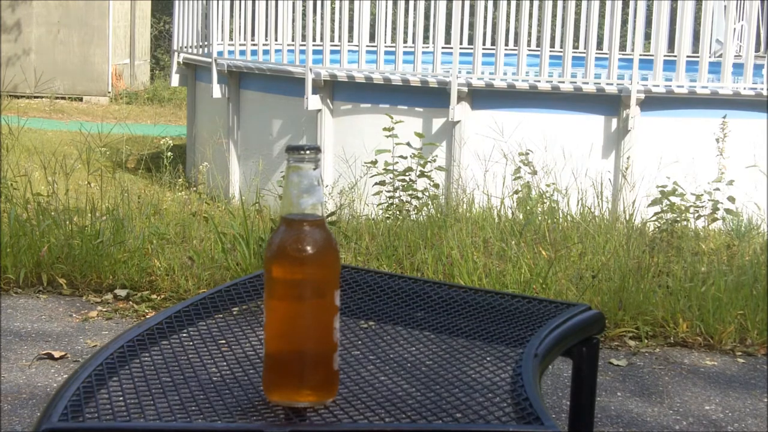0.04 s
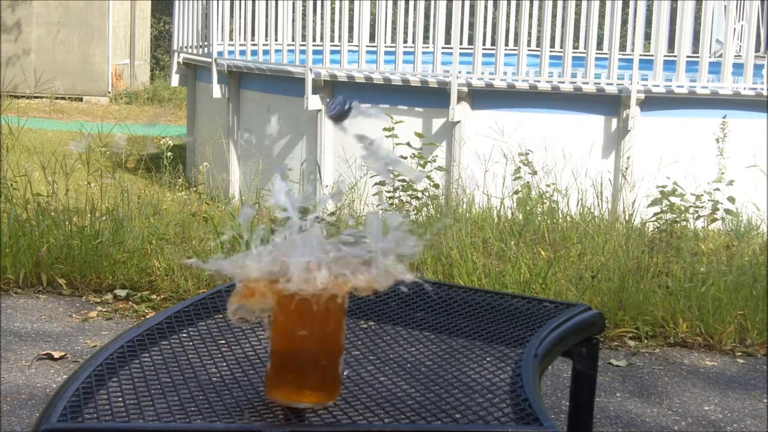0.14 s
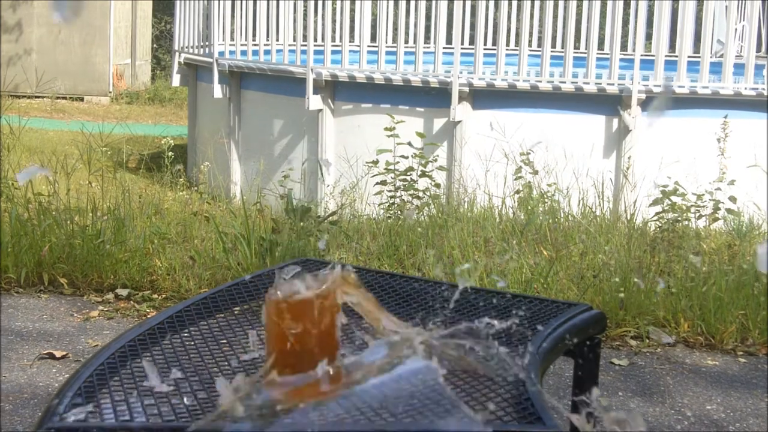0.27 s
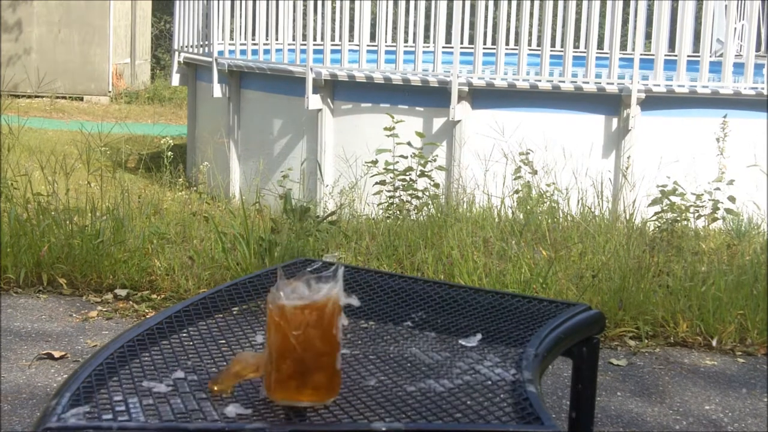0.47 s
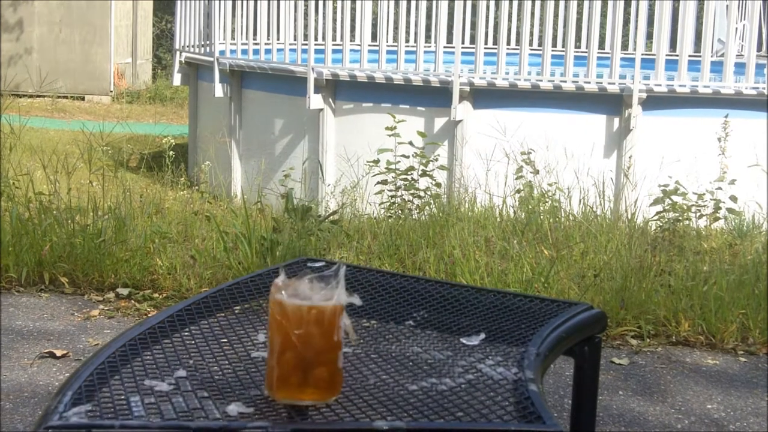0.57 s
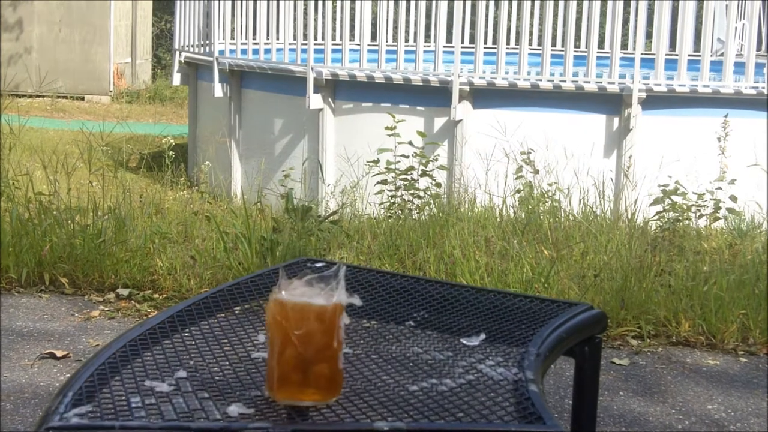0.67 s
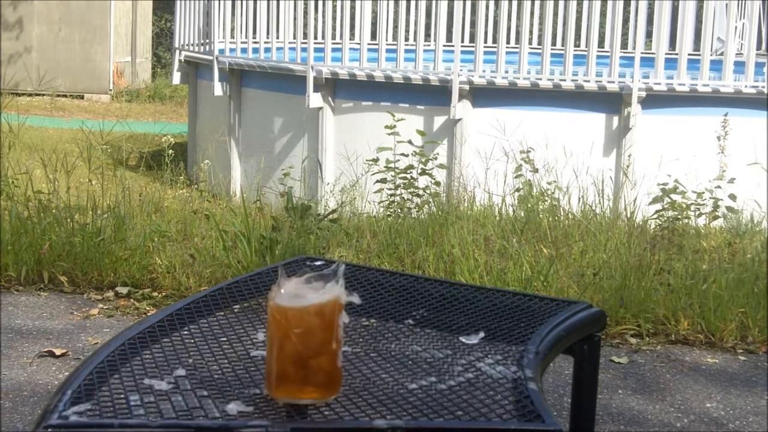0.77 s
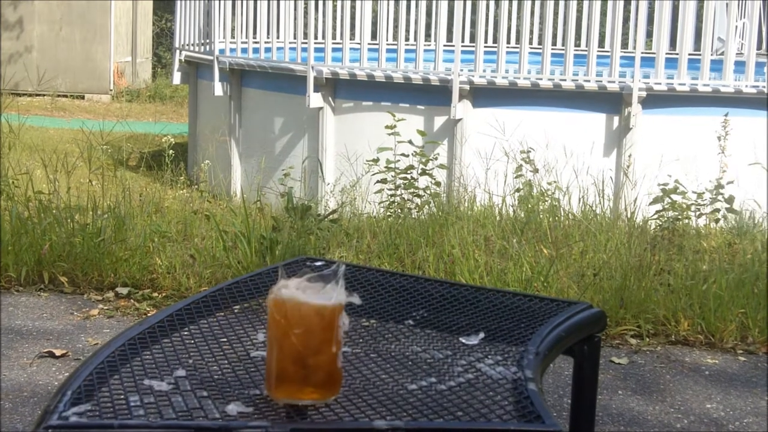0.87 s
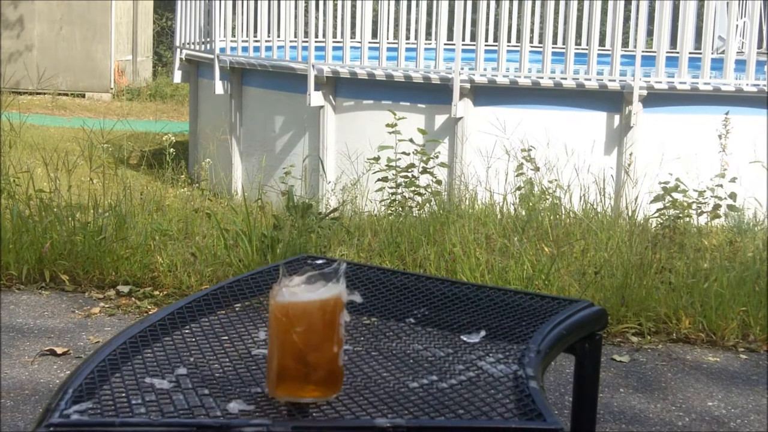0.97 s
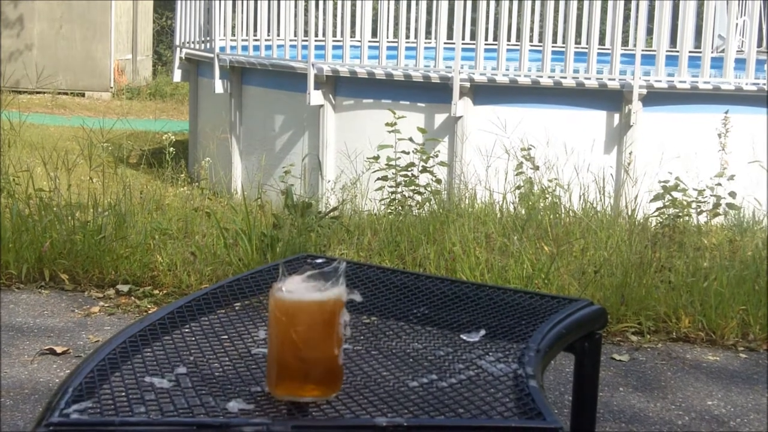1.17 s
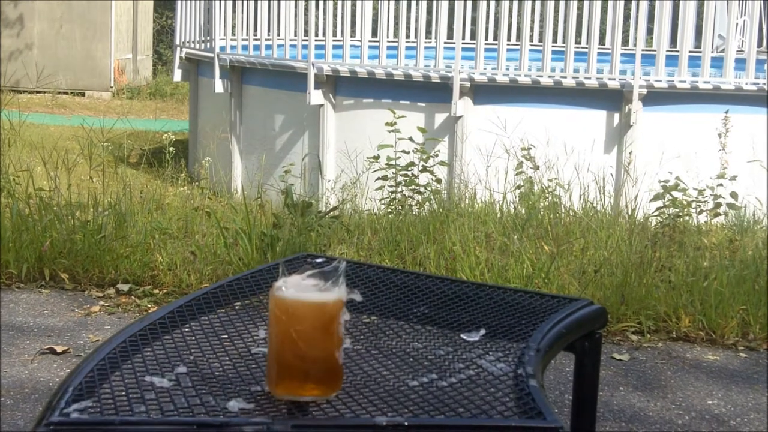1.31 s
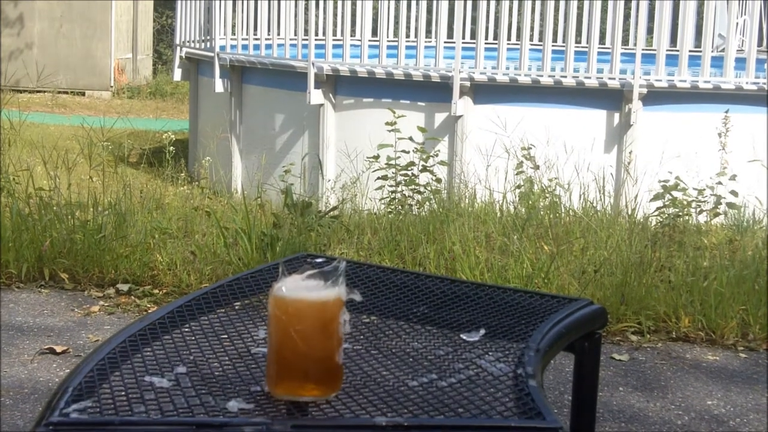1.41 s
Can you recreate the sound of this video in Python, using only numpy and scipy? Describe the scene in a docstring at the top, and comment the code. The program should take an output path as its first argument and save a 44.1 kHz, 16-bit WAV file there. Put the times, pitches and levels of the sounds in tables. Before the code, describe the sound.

A glass bottle cracks sharply at about 0.2 seconds and shatters with a loud, distorted bang at 0.25. Liquid and splinters spray down in a hiss from 0.3 to 0.6 seconds. Bright shards click from 0.55, and a heavier piece clanks on a metal table with a splash at 0.7. Softer knocks and high tinkles thin out until about 1.4 seconds, over a faint, low outdoor rumble.

```python
"""In a quiet garden, a shot hits a glass beer bottle on a steel mesh table. Brittle fracture gives
sharp cracks and splintering, then the pressure pulses of a bang overload the sound. Beer and splinters
spray down as a dense train of tiny impacts. Heavy pieces excite the modes of the metal, while small
shards tick and ring in damped free vibration as they settle. An automatic gain control ducks at the
bang and creeps back over the garden's low rumble."""
import sys
import numpy as np
from scipy import signal
from scipy.fft import rfft, irfft
from scipy.io import wavfile

SR = 44100
rng = np.random.default_rng(int(sys.argv[2]) if len(sys.argv) > 2 else 0)


def to_wav(sig):
    """Store sig (one row per channel, or 1-D mono) as 16-bit WAV at the path in sys.argv[1].

    Samples outside -1..1 are clipped; the rate is SR.
    """
    pcm = np.clip(np.atleast_2d(sig), -1, 1) * 32767
    pcm = np.round(pcm).astype(np.int16)
    wavfile.write(sys.argv[1], SR, pcm.T)  # frames by channels


N = 63945

# Spectrum of the garden's background. Each row: frequency in Hz, relative level in dB.
GARDEN_SPECTRUM = [(20, 7), (45, -5.5), (90, -2.5), (170, -15.5), (260, -12), (430, -23), (1100, -25.5),
                   (2500, -40), (4500, -45), (7400, -26), (10000, -49.5), (15000, -57.5)]

# Cracks of the bottle wall. Each row: start in seconds, peak level in dB.
CRACKS = [(.2033, 4.5), (.2037, -4), (.2049, 2), (.2070, -9), (.2528, 6.5)]
# Envelope of the splintering. Each row: time in seconds, level in dB.
SPLINTER_LEVELS = [(.203, -53), (.206, -23), (.216, -34), (.228, -28.5), (.240, -33), (.249, -15),
                   (.262, -13), (.280, -28), (.340, -30.5), (.370, -70)]
# Spectra of a crack and of the splintering. Each row: frequency in Hz, relative level in dB.
CRACK_SPECTRUM = [(100, -8.5), (500, -10), (1400, -0.5), (2100, -4.5), (3600, -17), (5000, -12),
                  (6100, 2.5), (8000, -11.5), (11000, -17), (15000, -36.5)]
SPLINTER_SPECTRUM = [(200, -10), (1700, -10.5), (3000, -14), (4500, -17.5), (6700, -7), (8500, -15.5),
                     (11000, -22.5), (15000, -41)]

# Freely ringing glass. Each row: start in seconds, pitch in Hz, level in dB, 60 dB decay time in seconds.
RINGS = [(.2160, 1457, -17.5, 0.024), (.2560, 791, -26, 0.3), (.5733, 8220, -9, 0.017),
         (.5735, 8500, -29.5, 0.15), (.6980, 11800, -18, 0.022), (.7745, 8510, -24, 0.073),
         (.7900, 7980, -24, 0.078), (0.86, 10200, -34.5, 0.08), (0.861, 4020, -33, 0.13),
         (0.869, 8670, -31, 0.07), (0.9617, 7960, -24.5, 0.093), (0.996, 8570, -29.5, 0.13),
         (.9982, 11860, -30, 0.045), (1.0601, 5617, -4, 0.03), (1.0752, 5640, -12.5, 0.028),
         (1.0975, 11840, -36, 0.13), (1.109, 10330, -28.5, 0.22), (1.1180, 8570, -32.5, 0.23),
         (1.1644, 5640, -18, 0.03), (1.2090, 8560, -35.5, 0.19), (1.2738, 8010, -32, 0.19),
         (1.321, 4070, -38.5, 0.19), (1.3320, 10130, -37, 0.1), (1.3780, 10260, -36, 0.19)]
# Dry impacts of shards, the first row a high crack of the bottle just before the bang. Each row: start in
# seconds, pitch in Hz, level in dB.
TICKS = [(0.247, 6800, -18), (0.5572, 5600, -0.5), (0.5604, 6110, 8.5), (0.5735, 8000, -1.5),
         (0.6437, 5600, -2.5), (0.6452, 6490, 7), (0.6497, 6230, -2), (.6980, 6300, -4.5), (0.704, 7500, 0),
         (0.7127, 6570, 5.5), (.8505, 6500, -18), (0.9982, 6000, -7), (1.0111, 6950, -5.5),
         (1.0150, 6400, -2), (1.0591, 8300, -7), (1.1034, 6400, -9), (1.2037, 5700, -21),
         (1.2395, 6400, -16), (1.2850, 6200, -8.5), (1.2948, 6930, -14.5), (1.3027, 6460, -16),
         (1.3746, 6960, -22), (1.4153, 7030, -16.5)]
# Spectrum of a shard's impact. Each row: frequency in Hz, relative level in dB.
TICK_SPECTRUM = [(300, -37), (1500, -9.5), (3000, -10), (4300, -12), (6100, 10), (9000, 1), (12000, -8),
                 (15500, -23.5)]

# Pressure pulses of the bang. Each row: start in seconds, peak level in dB.
BANG_PULSES = [(.2515, 23.5), (.2533, 15), (.2550, 0.5), (.2568, 1.5)]
# Spectrum of the pulses and their tail. Each row: frequency in Hz, relative level in dB.
BANG_SPECTRUM = [(30, -8), (110, 3.5), (250, -9.5), (600, 1), (1200, 1.5), (1800, 4.5), (2900, -6.5),
                 (4000, -23), (7000, -5), (15000, -18.5)]
# Short ring left by the bang. Each row: frequency in Hz, level in dB.
BANG_MODES = [(640, -8.5), (1175, -28), (1770, -17), (2900, -6)]

# Envelope of the falling spray. Each row: time in seconds, level in dB.
SPRAY_LEVELS = [(.285, -73), (.305, -20), (.318, -71), (.350, -34), (.368, -19.5), (.392, -17), (.412, -26),
                (.430, -18), (.480, -27.5), (.550, -29.5), (.620, -36.5), (.675, -44), (.709, -44),
                (.717, -19), (.765, -48.5), (1.30, -56)]
# Spectra of the spray and of the late patter. Each row: frequency in Hz, relative level in dB.
SPRAY_SPECTRUM = [(200, -28), (800, -11.5), (3100, -6), (4500, -10.5), (6300, 2), (8000, -3.5),
                  (10000, -14.5), (15000, -32)]
PATTER_SPECTRUM = [(2500, -26), (6300, 0), (9000, -16), (15000, -34)]

# Heavy pieces striking the table. Each row: start in seconds, clatter level in dB, ring level in dB,
# rise time in seconds, 60 dB decay time of the low clatter in seconds, favoured frequency in Hz.
CLANKS = [(0.7106, -12, -19, 0.0043, 0.21, 348), (0.774, -29, -29.5, 0.0025, 0.34, 152),
          (0.9, -26, -32.5, 0.0017, 0.33, 254), (1.0030, -25.5, -31.5, 0.006, 0.37, 458)]
# Modes of the table. Each row: frequency in Hz, relative level in dB, 60 dB decay time in seconds.
TABLE_MODES = [(152.46, -15.5, 1.24), (254, -27.5, 2.5), (351.5, -9.5, 0.2), (457.5, -17, 0.92),
               (662.6, -0.5, 0.15), (724, 10, 0.054), (814, -6, 0.33), (988, -7.5, 0.33), (1235, -15, 0.1),
               (1412, -6.5, 0.21), (1745, -6.5, 0.33), (2215, -18, 0.31), (2740, -5.5, 0.18)]
# Spectra of the table's clatter and boom. Each row: frequency in Hz, relative level in dB.
CLATTER_SPECTRUM = [(60, -19), (160, 2.5), (400, -5.5), (800, 2), (1500, 2.5), (2700, -0.5), (3600, -10.5),
                    (4700, -5.5), (6300, 1), (8000, -12.5), (11000, -19), (15000, -34)]
BOOM_SPECTRUM = [(40, -11), (100, -14), (170, -4), (280, -4.5), (450, -7), (900, -16), (2500, -47)]

TOP_HZ = 15550
ANTIPHASE = np.array([[1], [-1]])  # left and right signs of a side signal


def undb(db):
    """Amplitude ratio of a level in decibels."""
    return 10 ** (np.asarray(db) / 20)


def clock():
    """Time of every sample in seconds."""
    return np.arange(N) / SR


def tone(start, hz):
    """Simple harmonic motion with zero phase at the start time."""
    return np.sin(2 * np.pi * hz * (clock() - start))


def fade(start, t60, rise=.0005):
    """Damping envelope: a quick rise, then exponential decay by 60 dB in t60 seconds."""
    age = np.maximum(clock() - start, 0)
    return (1 - np.exp(-age / rise)) * np.exp(-np.log(1000) * age / t60)


def curve(rows):
    """Envelope interpolated in decibels through (seconds, dB) points, silent before the first."""
    times, db = np.array(rows).T
    return undb(np.interp(clock(), times, db, left=-120))


def colour(x, spectrum):
    """Convolution with the minimum-phase impulse response of a spectrum, scaled to peak 1."""
    size = 8192
    hz, db = np.array(spectrum, float).T
    bin_hz = np.fft.rfftfreq(size, 1 / SR)
    gain = undb(np.interp(np.log(bin_hz + 1), np.log(hz), db))
    cepstrum = irfft(np.log(gain))
    cepstrum[1:size // 2] *= 2  # folding onto positive time makes the response causal
    cepstrum[size // 2 + 1:] = 0
    response = irfft(np.exp(rfft(cepstrum)))[:size // 2]
    return signal.fftconvolve(x, response / np.abs(response).max())[:N]


def noise(spectrum):
    """Filtered Gaussian noise, rms 1."""
    x = colour(rng.standard_normal(N), spectrum)
    return x / x.std()


def grains(spectrum, per_s, spread_db):
    """Shot noise: tiny impacts of uneven size at random times, rms 1."""
    sizes = undb(spread_db * np.minimum(rng.exponential(size=N), 4))
    hits = rng.random(N) < per_s / SR
    x = colour(hits * sizes * rng.choice([-1, 1], N), spectrum)
    return x / x.std()


def blows(rows, spectrum):
    """Superposition of impulse responses, one for each (seconds, dB) row."""
    impulses = np.zeros(N)
    for start, db in rows:
        impulses[round(start * SR)] += undb(db)
    return colour(impulses, spectrum)


def garden(air_db=-39, motor_hz=299, motor_db=-50):
    """Broadband noise gives low rumble and faint hiss; a distant motor's periodic vibration hums."""
    mid = undb(air_db) * noise(GARDEN_SPECTRUM) + undb(motor_db) * tone(0, motor_hz)
    side = undb(air_db - 17) * noise(GARDEN_SPECTRUM)
    return mid + side * ANTIPHASE


def bottle_fracture():
    """Brittle fracture releases stress in a few sharp cracks amid dense splintering."""
    splinters = curve(SPLINTER_LEVELS) * grains(SPLINTER_SPECTRUM, per_s=4500, spread_db=.5)
    return blows(CRACKS, CRACK_SPECTRUM) + splinters


def glass_rings(mean_beat_hz=90, upper_ratio=1.6, flutter_hz=140, rise_s=.00028):
    """Free vibration follows a click: a main mode beats with a close twin under a faint upper mode."""
    out = blows([(start, db - 10) for start, hz, db, t60 in RINGS], TICK_SPECTRUM)
    for start, hz, db, t60 in RINGS:
        split, phase = rng.random(2)
        twin_hz = hz + mean_beat_hz * (.5 + split)
        twin = undb(-10) * np.sin(2 * np.pi * (twin_hz * clock() + phase))
        upper_hz = hz * upper_ratio
        upper = undb(-21) * fade(start, t60=.12) * tone(start, upper_hz) * (upper_hz < TOP_HZ)
        flutter = signal.lfilter(*signal.butter(2, flutter_hz, fs=SR), rng.standard_normal(N))
        waver = 1 + .3 * flutter / flutter.std()
        linger = undb(-32) * fade(start, t60=.6, rise=rise_s)
        envelope = fade(start, t60, rise_s) + linger
        out += undb(db) * envelope * waver * (tone(start, hz) + twin + upper)
    return out


def shard_ticks():
    """Brief contact gives each shard, and the bottle's high crack before the bang, a broadband snap, a heavily
    damped pitch and a short scatter."""
    snaps = blows([(start, db - 6) for start, hz, db in TICKS], TICK_SPECTRUM)
    pips = sum(undb(db) * fade(start, t60=.0028, rise=.0001) * tone(start, hz)
               for start, hz, db in TICKS)
    scatter = sum(undb(db - 26) * fade(start, t60=.04) for start, hz, db in TICKS)
    return snaps + pips + scatter * grains(TICK_SPECTRUM, per_s=2300, spread_db=2)


def bang():
    """Impulsive excitation: closely spaced pressure pulses leave a hollow ring and an outdoor tail."""
    start = BANG_PULSES[0][0]
    tail = undb(-20) * fade(start, t60=.13) * noise(BANG_SPECTRUM)
    ring = fade(start, t60=.023) * sum(undb(db) * tone(start, hz) for hz, db in BANG_MODES)
    return tail + ring - blows(BANG_PULSES, BANG_SPECTRUM)


def spray():
    """Impacts of drops and splinters merge into noise: two waves, then a splash as a heavy piece lands."""
    return curve(SPRAY_LEVELS) * grains(SPRAY_SPECTRUM, per_s=6000, spread_db=1)


def patter():
    """Late drops and splinters land as sparse shot noise whose level decays exponentially."""
    drops = grains(PATTER_SPECTRUM, per_s=170, spread_db=3)
    return undb(-40) * fade(start=.69, t60=3.14) * drops


def table_clanks(split_hz=4700, treble_t60_share=.52, favour_db=14):
    """Modal excitation: each landing spot favours one mode; damping takes the clatter's treble first."""
    clatter = grains(CLATTER_SPECTRUM, per_s=7900, spread_db=3)
    boom = noise(BOOM_SPECTRUM)
    low = signal.filtfilt(*signal.butter(2, split_hz, fs=SR), clatter)
    treble = clatter - low
    out = np.zeros(N)
    for start, clatter_db, ring_db, rise, t60, favoured_hz in CLANKS:
        nearest_hz = min(TABLE_MODES, key=lambda mode: abs(mode[0] - favoured_hz))[0]
        modes = sum(undb(db + favour_db * (hz == nearest_hz)) * fade(start, ring_s, rise) * tone(start, hz)
                    for hz, db, ring_s in TABLE_MODES)
        body = modes + undb(-8) * fade(start, t60=.72, rise=rise) * boom
        rattle = fade(start, t60, rise) * low + fade(start, t60 * treble_t60_share, rise) * treble
        out += undb(clatter_db) * rattle + undb(ring_db) * body
    return out


def scene():
    """The sources superpose straight ahead; faint early reflections give a little width."""
    mid = bottle_fracture() + bang() + spray() + patter()
    mid += shard_ticks() + glass_rings() + table_clanks()
    reflections = rng.standard_normal(N) * fade(0, t60=.015)
    side = undb(-28) * signal.fftconvolve(mid, reflections / np.linalg.norm(reflections))[:N]
    return mid + side * ANTIPHASE + garden()


def record(dry, limit_db=1, max_duck_db=13, attack_s=.0048, recover_db_per_s=7.5):
    """Compression and overload: after a notch, the gain ducks fast and recovers slowly; peaks clip."""
    notch_hz, width_hz = 4237, 800
    notch = signal.iirnotch(notch_hz, notch_hz / width_hz, fs=SR)
    notched = signal.lfilter(*notch, signal.lfilter(*notch, dry))
    peak_db = 20 * np.log10(np.abs(notched).max(axis=0) + 1e-9)
    excess_db = np.clip(peak_db - limit_db, 0, max_duck_db)
    recovery_db = recover_db_per_s * clock()
    held_db = np.maximum.accumulate(excess_db + recovery_db) - recovery_db  # a slowly sinking peak hold
    pole = np.exp(-1 / (attack_s * SR))
    duck_db = signal.lfilter([1 - pole], [1, -pole], held_db)
    dc_offset = np.array([[.0079], [.038]])
    clipped = np.clip(notched * undb(-duck_db) + dc_offset, -.93, .93)
    lowpass = signal.firwin(255, TOP_HZ, fs=SR)
    return signal.fftconvolve(clipped, lowpass[None], mode="same", axes=1)


dry = scene()
out = record(dry)
to_wav(out)
```